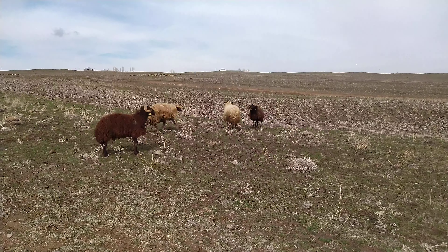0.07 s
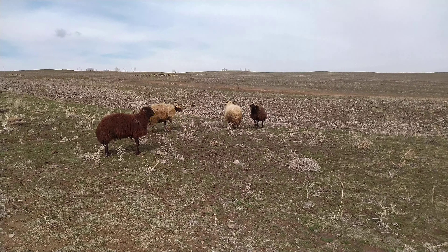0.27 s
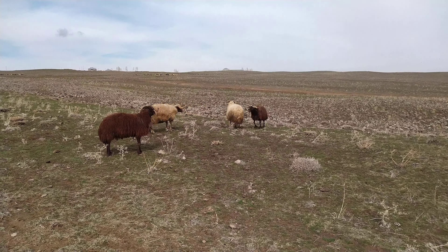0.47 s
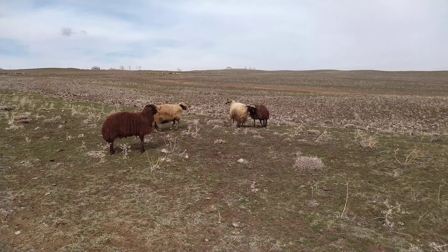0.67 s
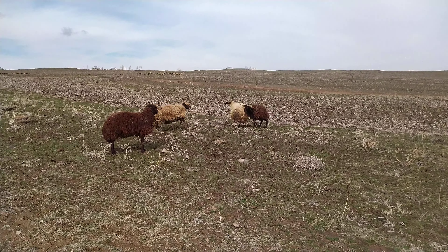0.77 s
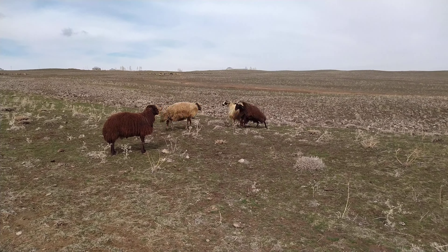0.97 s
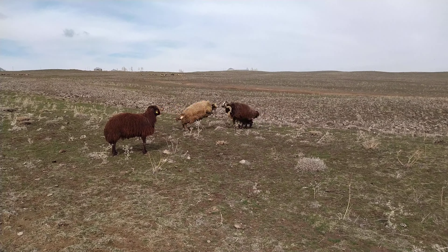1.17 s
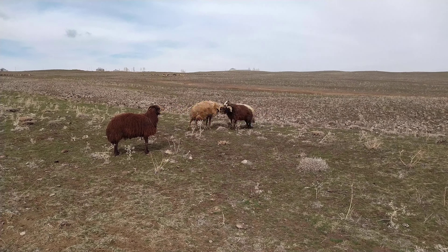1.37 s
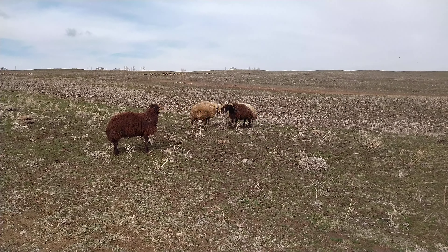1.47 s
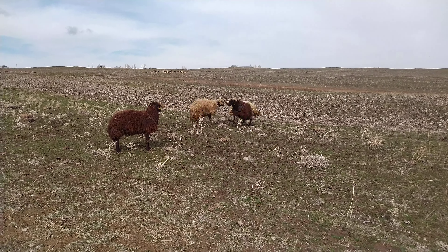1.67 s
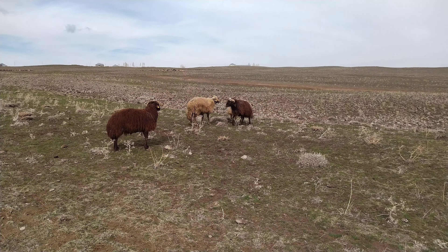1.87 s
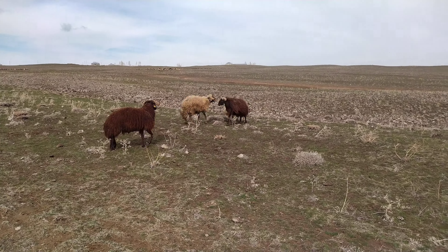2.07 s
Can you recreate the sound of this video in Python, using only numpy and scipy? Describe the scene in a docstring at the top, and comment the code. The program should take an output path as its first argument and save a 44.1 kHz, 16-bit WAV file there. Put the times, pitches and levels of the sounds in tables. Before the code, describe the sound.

A sharp crack of rams butting horns, then lighter knocks and hooves in dry grass.

```python
"""Two rams clash horns on open pasture. Light wind, a thin hiss and a far bird lie behind throughout.
First, hooves scuff the soil and dry stalks snap. At 1.26 s, in a soft gust, the horns meet: one sharp
crack rings horn and skull and sends a thump through the bodies. Five smaller knocks follow within 0.2 s,
and the rough ground scatters a faint tail. Last come more steps, snapping stalks and one more whistle."""
import sys
import numpy as np
from scipy import signal
from scipy.fft import rfft, irfft
from scipy.io import wavfile

SR = 44100
rng = np.random.default_rng(int(sys.argv[2]) if len(sys.argv) > 2 else 0)


def transcribe(signal):
    """Save signal, clipped to [-1, 1], as a 16-bit WAV file at the path in sys.argv[1]."""
    frames = np.atleast_2d(signal).T
    limited = np.clip(frames, -1, 1)
    pcm = np.round(limited * 32767).astype(np.int16)
    wavfile.write(sys.argv[1], SR, pcm)


N = 93095


def amp(db):
    return 10 ** (np.asarray(db) / 20)


def unit_rms(x):
    return x / np.sqrt(np.mean(x ** 2) + 1e-20)


def lookup(table, hz):
    """Interpolates along log frequency."""
    freq_hz, value = np.transpose(table)
    return np.interp(np.log(hz + 1), np.log(freq_hz + 1), value)


def clock(length_s):
    return np.arange(int(length_s * SR)) / SR


def pan(left_right_db):
    return amp(np.array([[.5], [-.5]]) * left_right_db)


def add(mix, start_s, sound):
    part = mix[:, max(round(start_s * SR), 0):][:, :sound.shape[-1]]
    part += sound[..., :part.shape[1]]


def bins_hz(x):
    return np.fft.rfftfreq(x.shape[-1], 1 / SR)


def colour(x, spectrum, pitch_ratio=1):
    """Filters by a spectrum; output at rms 1."""
    gain = amp(lookup(spectrum, bins_hz(x) / pitch_ratio))
    return unit_rms(irfft(rfft(x) * gain, x.shape[-1]))


def flat_noise(t):
    """Flat spectrum, random phases."""
    return unit_rms(irfft(np.exp(2j * np.pi * rng.random(len(t) // 2 + 1)), len(t)))


def gritty_noise(t):
    return flat_noise(t) * rng.exponential(1, len(t))


def wander(progress, points):
    """A line through random points, for progress 0 to 1."""
    return np.interp(progress, np.linspace(0, 1, points), rng.standard_normal(points))


# left-right likeness: freq_hz, correlation
STEREO_COHERENCE = [(30, .6), (130, 0.35), (290, 0.78), (640, 0.24), (1400, 0), (3000, 0)]


def diffuse_noise(t):
    """Stereo noise, partly alike in the bass, unrelated in the treble."""
    left, other = rfft(flat_noise(t)), rfft(flat_noise(t))
    likeness = np.clip(lookup(STEREO_COHERENCE, bins_hz(t)), -1, 1)
    right = likeness * left + np.sqrt(1 - likeness ** 2) * other
    return irfft(np.array([left, right]), len(t))


# steady wind and hiss: freq_hz, density_db
AIR_SPECTRUM = [(20, 6), (50, -1.5), (100, -5), (220, -5.5), (450, -15), (900, -18.5), (1500, -20.5),
                (2200, -18.5), (3100, -21.5), (5000, -24), (7000, -24.5), (9000, -21.5), (10800, -33),
                (15500, -32)]
# low gust: freq_hz, density_db
GUST_SPECTRUM = [(20, 1.5), (70, -2.5), (120, -10), (220, -9), (500, -22.5), (2000, -46.5), (15000, -68.5)]
AIR_DB, AIR_SWELL_DB = -65, -1.5
GUST_PEAK_S, GUST_WIDTH_S, GUST_DB = 1.25, .35, -63


def wind():
    """Light wind and hiss, swelling gently, with one low gust."""
    t = np.arange(N) / SR
    waves = [np.sin(2 * np.pi * (hz * t + rng.random())) / np.sqrt(hz) for hz in np.geomspace(.5, 12, 20)]
    swell = amp(AIR_DB + AIR_SWELL_DB * unit_rms(sum(waves)))
    gust_envelope = amp(GUST_DB) * np.exp(-((t - GUST_PEAK_S) / GUST_WIDTH_S) ** 2)
    gust = colour(diffuse_noise(t), GUST_SPECTRUM) * gust_envelope
    return colour(diffuse_noise(t), AIR_SPECTRUM) * swell + gust


# bird calls: start_s, length_s, start_hz, middle_hz, end_hz, level_db
BIRD_WHISTLES = [(.365, 0.057, 4150, 3650, 3600, -74), (0.448, 0.13, 4100, 3950, 4000, -75),
                 (0.704, 0.038, 4000, 3850, 3360, -72), (0.838, 0.098, 3280, 3213, 3310, -73.5),
                 (1.061, .13, 4040, 3790, 4540, -72), (2.031, .042, 4215, 4060, 3400, -62.5)]
FLUTTER_DEPTH_DB, FLUTTER_DEPTH_HZ = 2.5, 44.4


def bird():
    """Thin gliding whistles that flutter with distance."""
    out = np.zeros((2, N))
    for start_s, length_s, start_hz, middle_hz, end_hz, level_db in BIRD_WHISTLES:
        progress = clock(length_s) / length_s
        glide = np.polyfit([0, .5, 1], [start_hz, middle_hz, end_hz], 2)
        pitch_hz = np.polyval(glide, progress) + FLUTTER_DEPTH_HZ * wander(progress, points=24)
        gain = amp(level_db + FLUTTER_DEPTH_DB * wander(progress, points=12))
        arch = np.sqrt(np.sin(np.pi * progress))
        add(out, start_s, gain * arch * np.sin(2 * np.pi * np.cumsum(pitch_hz) / SR))
    return out


def distance_blur(x, t60_s=0.057):
    """Many short paths over the ground smear a far sound."""
    t = clock(0.071)
    paths = diffuse_noise(t) * amp(-60 * t / t60_s)
    return signal.fftconvolve(x, paths / np.linalg.norm(paths[0]), axes=1)[:, :N]


# breaking straw: freq_hz, density_db
STRAW_SPECTRUM = [(500, -29.5), (2200, -19), (3200, -20.5), (5500, -12), (7200, -9.5), (8700, -1),
                  (9700, -4.5), (10800, -17), (13500, -21), (15500, -33)]
# grass rustle: time_s, level_db
RUSTLE_ENVELOPE = [(0, -64), (0.013, -49), (0.039, -69), (.09, -72.5), (.13, -66), (.2, -75), (.38, -67),
                   (.95, -69.5), (1.14, -71.5), (1.24, -59.5), (1.34, -57), (1.42, -52.5), (1.445, -57),
                   (1.47, -61), (1.52, -58.5), (1.58, -66.5), (1.68, -61.5), (1.77, -58), (1.81, -65),
                   (1.95, -68), (1.985, -58), (2.04, -62), (2.11, -69.5)]
# single stalks: start_s, level_db, pitch_ratio, left_right_db
STALK_SNAPS = [(.006, -49, 1, -3), (.021, -45.5, 1, 4), (.368, -55.5, 0.78, 8), (.407, -57, .9, 15),
               (0.764, -66, .85, -23), (0.825, -53, 1, -6), (1.351, -39.5, 0.99, 2),
               (1.406, -30.5, .98, 3.5), (1.429, -53, 1, 4), (1.436, -47, 0.98, 6),
               (1.7005, -45, 0.88, 9.5), (1.713, -47, 0.71, 3), (1.7325, -53, .85, 12),
               (1.7445, -45, 0.76, 6), (1.753, -46, .9, 8), (1.965, -42, 0.94, 3), (1.981, -53, 0.75, 7),
               (2.016, -61, 1, 3)]
GRAINS_PER_S, GRAIN_SPREAD_DB, CLUMP_DB = 1800, 2.5, 3
STALK_ATTACK_S, STALK_T60_S = 0.00053, 0.011


def grass():
    """Dry stalks snap singly over a rustle of tiny cracks that come in short clumps."""
    sizes = amp(GRAIN_SPREAD_DB * np.minimum(rng.exponential(1, (2, N)), 5))
    signs = rng.choice([-1, 1], (2, N))
    grains = sizes * signs * (rng.random((2, N)) < GRAINS_PER_S / SR)
    clumps = amp(CLUMP_DB * wander(np.arange(N) / N, points=220))
    rustle_db = np.interp(np.arange(N) / SR, *np.transpose(RUSTLE_ENVELOPE))
    out = colour(grains * clumps, STRAW_SPECTRUM) * amp(rustle_db)
    t = clock(.04)
    attack = np.minimum(t / STALK_ATTACK_S, 1)
    for start_s, level_db, pitch_ratio, left_right_db in STALK_SNAPS:
        snap = colour(diffuse_noise(t), STRAW_SPECTRUM, pitch_ratio)
        add(out, start_s, pan(left_right_db) * snap * attack * amp(level_db - 60 * t / STALK_T60_S))
    return out


# microphone port imbalance: freq_hz, left_right_db
PORT_BALANCE = [(200, 0.5), (1200, -2.5), (2100, 27), (3300, 9), (5500, 14.5), (7500, 5), (9000, -2),
                (15000, -9)]
PORT_LAG_S, PORT_LAG_ABOVE_HZ = 0.00013, 2200


def mic_ports(x):
    """Two ports colour a sound from the rams; treble reaches the left one later."""
    hz = bins_hz(x)
    spectra = rfft(x) * pan(lookup(PORT_BALANCE, hz))
    spectra[0] *= np.exp(-2j * np.pi * PORT_LAG_S * np.maximum(hz - PORT_LAG_ABOVE_HZ, 0))
    return irfft(spectra, len(x))


# hoof falls: start_s, level_db
HOOF_STEPS = [(0.114, -61), (1.07, -55.5), (1.204, -67), (1.393, -47), (1.53, -54.5), (1.574, -56),
              (1.63, -57.5)]
# turf thump: freq_hz, density_db
TURF_SPECTRUM = [(30, -0.5), (70, -1), (130, -6.5), (250, 2), (450, -14), (1200, -25), (5000, -42.5)]
# hoof drags: start_s, length_s, level_db
HOOF_SCUFFS = [(.0, 0.084, -73), (0.111, 0.011, -73), (0.587, 0.0077, -66.5), (1.07, 0.032, -69.5),
               (1.194, 0.036, -62), (1.241, 0.014, -56), (1.306, .04, -49.5), (1.497, 0.033, -67),
               (1.564, 0.0174, -68), (1.719, .012, -62.5), (1.766, 0.022, -67), (1.831, 0.0079, -69),
               (1.975, 0.14, -69.5)]
# scraped soil: freq_hz, density_db
SOIL_SPECTRUM = [(100, 2), (300, 1), (700, -4.5), (1100, -3), (1500, -6.5), (2200, -7), (2900, -16.5),
                 (6000, -16), (15000, -41.5)]
STEP_ATTACK_S, STEP_T60_S = 0.0042, 0.12


def hooves():
    """Hooves thump the turf and drag through gritty soil."""
    out, t = np.zeros((2, N)), clock(.2)
    for start_s, level_db in HOOF_STEPS:
        envelope = np.minimum(t / STEP_ATTACK_S, 1) * amp(level_db - 60 * t / STEP_T60_S)
        add(out, start_s, colour(flat_noise(t), TURF_SPECTRUM) * envelope)
    for start_s, length_s, level_db in HOOF_SCUFFS:
        grit = colour(gritty_noise(t), SOIL_SPECTRUM)
        arch = np.sqrt(abs(np.sin(np.pi * np.minimum(t / length_s, 1))))
        add(out, start_s, mic_ports(grit) * amp(level_db) * arch)
    return out


# ground reflections: freq_hz, density_db
SCATTER_SPECTRUM = [(60, 6), (150, 3.5), (230, -4), (350, 7), (1000, 4.5), (1400, 1.5), (2000, -4),
                    (3000, -2.5), (4500, -8.5), (8500, -16.5), (15000, -7.5)]
# their decay: freq_hz, t60_s
SCATTER_DECAY = [(100, .55), (300, 0.33), (1000, 0.15), (2200, 0.3), (8000, 0.44)]


def ground_scatter(x, gain_db=-21):
    """Rough ground scatters a faint tail back."""
    noise = colour(diffuse_noise(clock(.7)), SCATTER_SPECTRUM)
    hz, time_s, bands = signal.stft(noise, SR, nperseg=256)
    decay = amp(-60 * time_s / lookup(SCATTER_DECAY, hz)[:, None])
    tail = signal.istft(bands * decay, SR, nperseg=256)[1]
    return signal.fftconvolve(x, tail / np.linalg.norm(tail[0]) * amp(gain_db), axes=1)[:, :N]


def click(spectrum, t):
    """Minimum-phase impulse with the given spectrum."""
    log_gain = np.log(amp(lookup(spectrum, abs(np.fft.fftfreq(len(t), 1 / SR)))))
    return np.fft.ifft(np.exp(np.conj(signal.hilbert(log_gain)))).real


# horn striking horn: freq_hz, density_db
CRACK_SPECTRUM = [(150, -18), (330, 6), (600, -5), (1100, -3.5), (1350, -16.5), (2200, -8), (3000, -20),
                  (4500, -14.5), (6500, -3.5), (8600, 2.5), (9800, -15), (11500, -32), (15500, -38)]
# horn grinding on horn: freq_hz, density_db
GRIND_SPECTRUM = [(100, -11), (300, -2), (1000, 7), (1400, -2.5), (2200, -12), (3200, -9.5), (6000, -11.5),
                  (8800, 0), (10500, -18.5), (13000, -10.5), (15500, -33)]
SNAP_DB, SNAP_LAG_S = 3, .0002
GRATE_DB, GRATE_T60_S = -15.5, .021
GRIND_DB, GRIND_T60_S = -29.5, 0.083


def horn_contact(t, grind_gain_db):
    """The horn surfaces snap together, grate briefly and grind on."""
    snap = amp(SNAP_DB) * np.roll(click(CRACK_SPECTRUM, t), round(SNAP_LAG_S * SR))
    grate = colour(flat_noise(t), CRACK_SPECTRUM) * amp(GRATE_DB - 60 * t / GRATE_T60_S)
    grind = colour(gritty_noise(t), GRIND_SPECTRUM) * amp(GRIND_DB + grind_gain_db - 60 * t / GRIND_T60_S)
    return mic_ports(snap + grate + grind) * (t < t[-1] / 2)  # gate removes FFT wrap-around


def mode(t, hz, level_db, t60_s, rise_cycles):
    """A partial that builds up and dies."""
    rise = 1 - np.exp(-(t * hz / rise_cycles) ** 2)
    return amp(level_db - 60 * t / t60_s) * rise * np.sin(2 * np.pi * hz * t)


# horn resonances: pitch_hz, level_db, t60_s, left_right_db
HORN_MODES = [(318.6, -26, 0.053, 2), (430, -18.5, 0.032, 0), (500, -25, 0.032, -0.5),
              (638, -26, 0.031, -0.5), (703, -26, 0.053, 0), (810, -32, .06, 1.5), (916, -30.5, .07, 2.5),
              (1018, -23.5, 0.0395, 0), (1100, -26.5, 0.039, 5), (1600, -25.5, .025, 0),
              (1806, -19.5, .024, 8), (2160, -18, 0.023, 15.5), (2300, -18, .022, 16.5),
              (4180, -32, 0.019, 3), (5414, -15.5, 0.0027, 8.5), (6700, -26.5, 0.012, 5.5),
              (8700, -12, .013, -2)]
# skull and neck resonances: pitch_hz, level_db, t60_s
SKULL_MODES = [(184.4, -24.5, 0.11), (226.6, -7, 0.047)]
# blows: start_s, level_db, lowpass_hz, highpass_hz, pitch_ratio, horn_db, skull_db, left_right_db
HORN_BLOWS = [(1.2635, 0.5, 13300, 59.7, 0.98, 0, -2, -0.5), (1.3302, -21, 2130, 450, 0.95, 0.5, 4, -2),
              (1.3905, -20.5, 1300, 795, .8, -6.5, -31, -5.5),
              (1.4229, -27, 2130, 1200, 0.99, -2, -4.5, -4), (1.451, -5, 1760, 3000, .92, -2.5, -28, -2),
              (1.4563, -18.5, 2080, 447, .84, -6.5, -4, -1.5)]


def horn_clash():
    """Each blow cracks and rings horn and skull; soft contacts lose treble, glancing ones bass."""
    out, t = np.zeros((2, N)), clock(.3)
    for blow in HORN_BLOWS:
        start_s, level_db, lowpass_hz, highpass_hz, pitch_ratio, horn_db, skull_db, left_right_db = blow
        crack = horn_contact(t, grind_gain_db=horn_db)
        ring = sum((-1) ** k * pan(side_db) * mode(t, hz * pitch_ratio, db + horn_db, t60_s, rise_cycles=.92)
                   for k, (hz, db, t60_s, side_db) in enumerate(HORN_MODES))
        thud = sum(mode(t, hz * pitch_ratio, db + skull_db, t60_s, rise_cycles=2.1)
                   for hz, db, t60_s in SKULL_MODES)
        highpass = signal.butter(1, highpass_hz, "high", fs=SR)
        lowpass = signal.butter(2, lowpass_hz, fs=SR)
        clack = signal.lfilter(*highpass, crack + ring)
        knock = signal.lfilter(*lowpass, clack + thud)
        add(out, start_s, amp(level_db) * pan(left_right_db) * knock)
    body_shock = mode(t, hz=61.65, level_db=-14.5, t60_s=0.068, rise_cycles=1.5)
    add(out, HORN_BLOWS[0][0], body_shock)
    return out


def scene():
    """The clash and its scatter over the sounds of the pasture."""
    clash = horn_clash()
    return clash + ground_scatter(clash) + hooves() + grass() + wind() + distance_blur(bird())


def record(dry, ceiling_db=-1, cutoff_hz=15650):
    """The crack overloads the microphone softly; then the band limit."""
    clipped = amp(ceiling_db) * np.tanh(dry / amp(ceiling_db))
    lowpass = signal.firwin(511, cutoff_hz, window=("kaiser", 9), fs=SR)
    return signal.oaconvolve(clipped, lowpass[None], "same")


dry = scene()
out = record(dry)
transcribe(out)
```